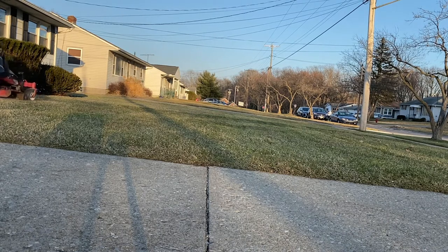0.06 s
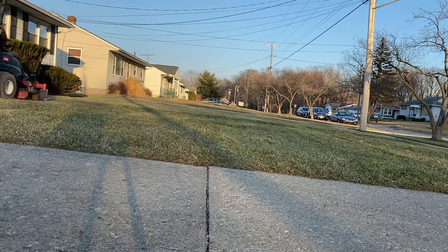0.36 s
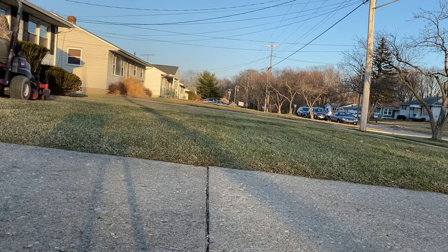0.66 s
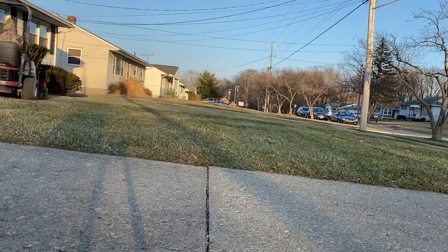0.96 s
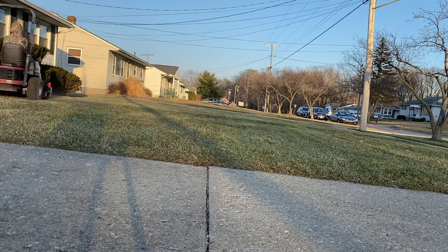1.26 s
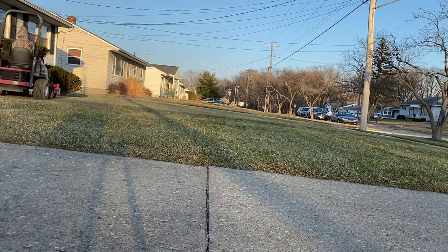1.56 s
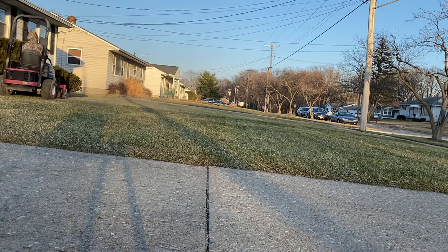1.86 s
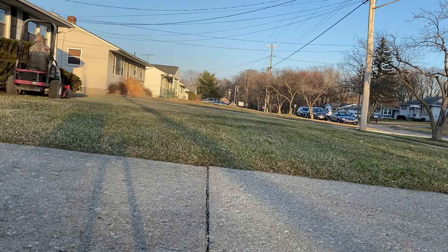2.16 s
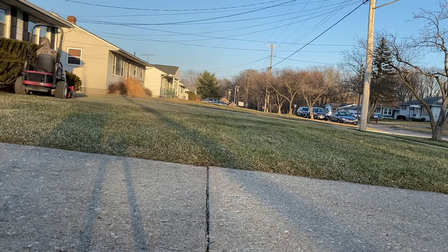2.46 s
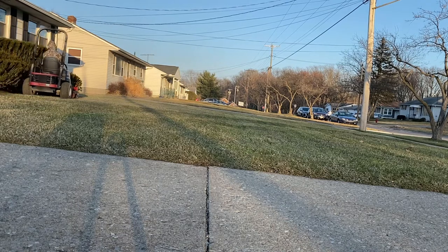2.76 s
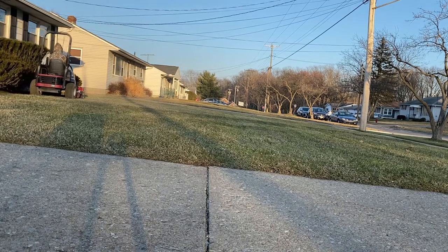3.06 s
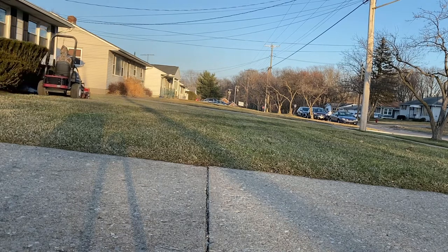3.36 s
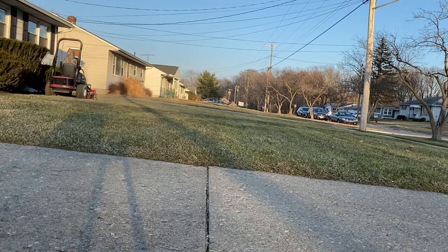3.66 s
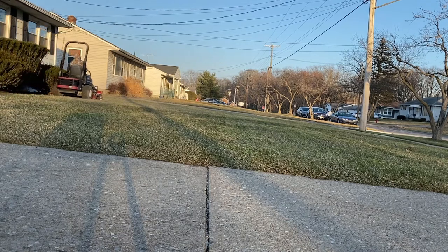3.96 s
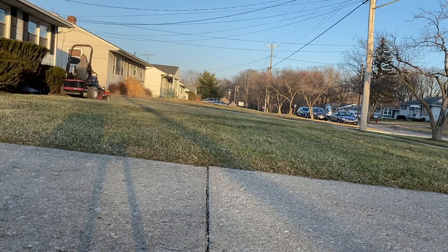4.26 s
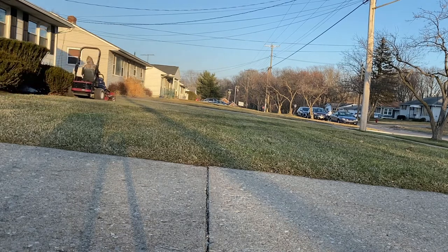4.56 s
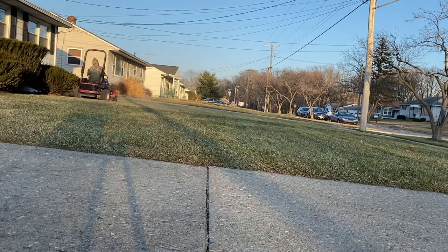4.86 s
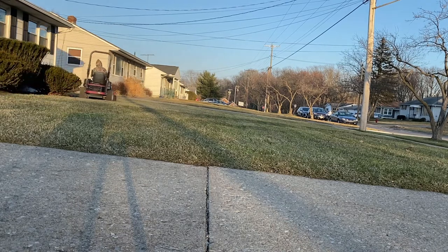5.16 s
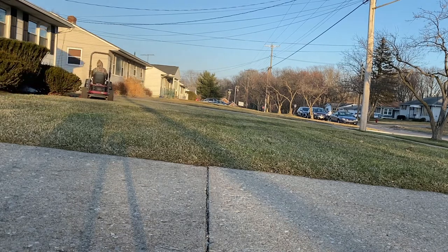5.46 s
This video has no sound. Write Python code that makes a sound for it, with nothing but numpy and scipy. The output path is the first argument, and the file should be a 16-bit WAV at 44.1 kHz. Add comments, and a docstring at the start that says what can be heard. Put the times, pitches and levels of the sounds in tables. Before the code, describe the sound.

The steady engine throb and pulsing blade hum of a riding lawn mower passing by and easing off across the grass.

```python
"""Belt-driven blades drone as a ride-on mower passes on the left and moves off over a lawn; two blade
tones and an engine overtone beat against each other. The V-twin petrol engine throbs at harmonics of the
four-stroke cycle rate, and the firings ring in the muffler. Turbulent air rushes out of the deck, the
cooling fan and grass clippings hiss, the valves tick, and a bit of grit strikes the deck once.
One left-right phase and level difference per frequency is applied to the whole sound."""
import sys
import numpy as np
from scipy import signal
from scipy.fft import rfft, irfft, next_fast_len
from scipy.io import wavfile
from scipy.ndimage import map_coordinates

SR = 44100
rng = np.random.default_rng(int(sys.argv[2]) if len(sys.argv) > 2 else 0)


def wrap_up_sound(samples):
    """Save the sound to the file named by the first command line argument, as 16-bit audio."""
    columns = np.atleast_2d(samples).T
    # keep every value between -1 and 1, then stretch to whole-number steps
    tamed = np.clip(columns, -1, 1)
    steps = np.round(tamed * 32767).astype(np.int16)
    wavfile.write(sys.argv[1], SR, steps)


N = 243431
TIME = np.arange(N) / SR


def blade_drone(passes):
    """Periodic loading of the air radiates the blade-pass tone and its octave; a higher tone joins them."""
    # blade-pass tone and its octave: t/s, level/dB
    fundamental = [(0.0, -22.5), (0.54, -17.5), (0.78, -19.5), (1.25, -16), (1.44, -22), (1.54, -36),
                   (1.69, -23), (1.8, -29), (1.86, -35), (2.09, -19), (2.29, -15.5), (2.61, -19.5),
                   (2.72, -27), (3.38, -13), (3.9, -12), (4.47, -26), (4.7, -18), (5.52, -20)]
    octave = [(0.0, -23.5), (0.44, -34.5), (0.66, -21.5), (0.83, -34), (1.03, -22.5), (1.16, -36.5),
              (1.33, -23), (1.47, -37.5), (1.98, -20), (2.16, -38.5), (2.2, -28.5), (3.05, -32),
              (3.22, -24), (4.04, -37), (4.58, -24.5), (4.73, -38.5), (4.79, -31), (5.25, -22.5),
              (5.35, -38.5), (5.5, -27)]
    # swelling tone near 386 Hz, an exhaust overtone mixed with blade drone: t/s, level/dB
    exhaust_overtone = [(0, -41), (.35, -31.5), (.55, -47.5), (.97, -30), (1.15, -38.5), (1.6, -41.5),
                        (1.83, -28), (2.13, -30.5), (2.35, -44), (2.48, -28.5), (2.65, -45), (3.1, -36.5),
                        (3.3, -45), (3.52, -33), (4.6, -34), (4.88, -42), (5.1, -33), (5.5, -35.5)]
    levels_db = curves(fundamental) + curves(octave) + curves(exhaust_overtone)
    flutter_passes = 0.0089
    return sum(amp(db) * tone(k * (passes + flutter_passes * wobble(7)))
               for k, db in enumerate(levels_db, 1))


def blade_engine_beats(passes):
    """Beating: harmonic k of three close tones beats at k times their frequency differences."""
    # two blade tones and the engine's fifth order: offset from the pass rate f/Hz, relative level/dB
    close_tones = [(.12, 0), (.915, -2.5), (-.67, -12)]
    # their upper harmonics: harmonic number, relative level/dB
    overtones = [(4, -32.5), (5, -46), (6, -49), (7, -45), (8, -51.5)]
    # swell of these harmonics together: t/s, gain/dB
    swell = [(.3, -7.5), (.62, 5), (1.1, -5), (1.55, 2.5), (3.2, -3.5), (4.1, 0), (5.1, 0.5), (5.5, -2.5)]
    in_step_s, drift_passes = 3.73, 0.02
    phases = [(passes + offset_hz * (TIME - in_step_s) + drift_passes * wobble(4), db)
              for offset_hz, db in close_tones]
    beats = np.zeros(N)
    for k, level_db in overtones:
        start = rng.random()
        harmonic = sum(amp(db) * np.sin(2 * np.pi * (k * turns + start)) for turns, db in phases)
        beats += amp(level_db) * unit(harmonic)
    return amp(curves(swell)[0]) * beats


def exhaust_throb(cycle):
    """Periodic gas pulses radiate engine orders, whole multiples of the cycle rate."""
    # strong low orders: t/s, then level/dB of orders 2, 3, 4 and 6
    low_orders = [(.3, -31, -31, -47, -29.5), (1.4, -35.5, -28.5, -44, -27.5),
                  (2.7, -37.5, -32.5, -34, -37), (3.8, -34.5, -45, -42, -32), (4.5, -31.5, -52, -42, -26.5),
                  (5.3, -33, -46, -31, -27.5)]
    # steadier orders: order, level/dB at closest approach
    upper_orders = [(7, -45.5), (8, -34.5), (9, -39), (11, -39.5), (12, -46), (14, -46), (30, -47),
                    (35, -48)]
    low = sum(amp(db) * tone(k * cycle) for k, db in zip((2, 3, 4, 6), curves(low_orders)))
    upper = sum(amp(db + 2.2 * wobble(4)) * tone(k * cycle) for k, db in upper_orders)
    return low + spreading() * upper


def muffler_bark(cycle):
    """Impulse excitation: two unevenly spaced firings a cycle set the muffler's resonances ringing."""
    # muffler response: f/Hz, relative level/dB
    resonances = [(200, -40), (330, -19), (480, 7.5), (900, -14.5), (1300, -6), (2000, -27.5), (4000, -59)]
    firings = np.zeros(N)
    for at in (0, 3 / 8):
        hits = np.flatnonzero(np.diff(np.floor(cycle - at)))
        firings[hits] = amp(1.6 * rng.standard_normal(len(hits)))
    t = TIME[:SR // 8]
    ring = rng.standard_normal(len(t)) * amp(-60 * t / 0.099)  # 60 dB down in 99 ms
    ringing = signal.fftconvolve(firings, ring)[:N]
    bark = unit(filtered(ringing, lambda hz: amp(along(resonances, hz))))
    return spreading() * amp(-32.5) * bark


def deck_and_fan(passes):
    """Turbulence in the deck and cooling fan makes broadband noise, modulated by each blade pass."""
    # spectra of the deck's rush and the fan's hiss: f/Hz, relative level/dB
    deck_spectrum = [(20, -19), (70, -4.5), (130, -0.5), (200, -1), (330, -1), (470, -1), (660, -3.5),
                     (830, -5), (1000, -2.5), (1300, -9), (1550, -16), (1850, -22.5), (3000, -66)]
    fan_spectrum = [(900, -7.5), (1750, -4), (2350, 2.04), (3300, -2.5), (4100, 2), (4700, -0.2),
                    (5300, 0.5), (5900, -3.5), (7000, -2), (8000, -4), (9000, -15), (15500, -17.5)]
    # strength of the hiss: t/s, level/dB
    hiss = [(0, -39), (.33, -36), (.65, -37.5), (1.6, -37), (2.8, -38), (5.15, -40), (5.5, -41.5)]
    chop = np.cos(2 * np.pi * passes)
    deck = spreading() * amp(-26.5 + 0.54 * wobble(12)) * rush(deck_spectrum, 1 + 0.16 * chop)
    fan = amp(curves(hiss)[0] + 0.59 * wobble(12)) * rush(fan_spectrum, 1 + 0.02 * chop)
    return deck + fan


def tappets_and_clippings(cycle):
    """Damped impacts: two tappets tick each cycle; a high hiss of clippings pulses with the engine."""
    # spectra of the tappets and the grass clippings: f/Hz, relative level/dB
    tappet_spectrum = [(4000, -46), (7000, -7.5), (7480, -1.5), (7850, -3.5), (8400, -6.5), (9300, -44),
                       (15000, -38)]
    clippings_spectrum = [(4000, -35), (8000, -40), (9800, 8.5), (12300, 2), (14000, -2.5), (15700, -4)]
    # envelope common to both: t/s, level/dB
    treble = [(0, -49), (.3, -46.5), (.6, -50), (1.25, -45.5), (2.2, -47.5), (2.75, -52.5), (4.95, -50),
              (5.5, -56)]
    loose = bursts(cycle, at=.89, decay=.11, scatter_db=2.2)
    answer = bursts(cycle, at=.56, decay=.15, scatter_db=2.5)
    tappets = rush(tappet_spectrum, loose + 0.31 * answer)
    pulses = bursts(cycle, at=.52, decay=.22, scatter_db=4.5)
    pulses += .6 * bursts(cycle, at=.94, decay=.11, scatter_db=4.0)
    clippings = rush(clippings_spectrum, 1 + 0.74 * pulses)
    return amp(curves(treble)[0]) * (amp(-.5) * tappets + amp(1.3 * wobble(11)) * clippings)


def grit():
    """A brief impact is rich in high frequencies: grit flicked against the deck gives a bright tick."""
    # the strike: t/s, level/dB before filtering
    strikes = [(1.711, -24)]
    envelope = sum(amp(db - 60 * np.abs(TIME - s) / .006) * (TIME >= s) for s, db in strikes)
    tick = envelope * rng.standard_normal(N)
    return filtered(tick, lambda hz: amp(along([(7000, -25), (13000, -2)], hz)))


def spreading():
    """Spherical spreading: pressure falls as 1/distance, with gain 1 at closest approach."""
    pass_s, closest_m, drive_m_per_s = 0.61, 6.12, 1.46
    return closest_m / np.hypot(closest_m, drive_m_per_s * (TIME - pass_s))


def rush(spectrum, gate=1):
    """Partial coherence: sum and difference of two gated, coloured noises give stereo of rms 1."""
    # likeness of left and right: f/Hz, correlation (0-1)
    coherence = [(150, 0.89), (600, 0.99), (1400, 0.91), (2700, 0.29), (4200, 0.89), (5500, 0.26),
                 (7300, 0.96), (9000, 1), (15000, 1)]

    def colour(hz):
        angle = np.arccos(np.clip(along(coherence, hz), 0, 1)) / 2
        return amp(along(spectrum, hz)) * [np.cos(angle), np.sin(angle)]

    common, apart = filtered(gate * rng.standard_normal((2, N)), colour)
    return unit(np.array([common + apart, common - apart]))


def bursts(cycle, at, decay, scatter_db):
    """Exponential decay restarted each engine cycle; at and decay are fractions of the cycle."""
    turn = cycle - at + 2
    size = amp(scatter_db * rng.standard_normal(400))
    return size[turn.astype(int)] * np.exp(-(turn % 1) / decay)


def tone(turns):
    """A sinusoid of rms 1 with random initial phase."""
    return np.sqrt(2) * np.sin(2 * np.pi * (turns + rng.random()))


def wobble(rate):
    """Smooth random modulation, a spline with rate knots a second."""
    return map_coordinates(rng.standard_normal(int(N * rate / SR) + 4), [TIME * rate])


def filtered(x, response):
    """Linear filtering: the spectrum of x times a complex frequency response."""
    m = next_fast_len(N + SR // 4)
    return irfft(rfft(x, m) * response(np.fft.rfftfreq(m, 1 / SR)), m)[..., :N]


def curves(rows):
    """Linear interpolation in time: one curve for each column after t/s."""
    times, *columns = np.transpose(rows)
    return [np.interp(TIME, times, column) for column in columns]


def along(points, hz):
    """Interpolation of (f/Hz, value) points on a logarithmic frequency axis."""
    f, values = np.transpose(points)
    return np.interp(np.log(hz + 1), np.log(f + 1), values)


def amp(db):
    """Decibels to amplitude ratio."""
    return 10 ** (np.asarray(db) / 20)


def unit(x):
    """Normalisation to rms 1."""
    return x / np.sqrt(np.mean(x ** 2) + 1e-20)


def scene():
    """Superposition: the whole sound takes one left-right phase and level difference per frequency."""
    # engine speed, as the governor hunts a little: t/s, four-stroke cycle rate f/Hz
    speed = [(0, 25.4), (.5, 25.73), (1.2, 25.38), (1.44, 25.85), (1.75, 25.48), (2.64, 25.71),
             (3.36, 25.52), (3.65, 25.78), (4.32, 25.98), (4.8, 25.34), (5.52, 25.8)]
    # phase lead of the left channel: f/Hz, phase/rad
    lead = [(20, 0), (130, 0.13), (500, 0.95), (1000, 1.57), (1500, 2.51), (2300, 5.57), (5200, 6.5),
            (7000, 6.2), (8000, 4.56), (8900, 3.1), (11000, 0.73), (13200, -3.1), (15200, -6.3)]
    # left minus right: f/Hz, level/dB
    tilt = [(60, 0.5), (120, -2), (200, -0.5), (380, -1.5), (700, 6), (1290, 5), (2380, 5.5), (4400, 3),
            (8120, 0)]
    cycle = np.cumsum(curves(speed)[0]) / SR
    passes = 5.025 * cycle  # blade passes per engine cycle, set by the belt pulleys
    exhaust = exhaust_throb(cycle) + muffler_bark(cycle)
    drone = blade_drone(passes) + blade_engine_beats(passes)
    mower = drone + exhaust + deck_and_fan(passes) + tappets_and_clippings(cycle) + grit()
    half = np.array([[.5], [-.5]])  # each channel takes half of the difference
    return filtered(mower, lambda hz: amp(half * along(tilt, hz)) * np.exp(1j * half * along(lead, hz)))


def record(dry):
    """Band limiting: an ideal low-pass filter removes the highest treble."""
    return filtered(dry, lambda hz: hz < 15850)


dry = scene()
out = record(dry)
wrap_up_sound(out)
```